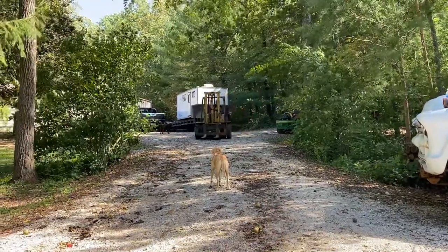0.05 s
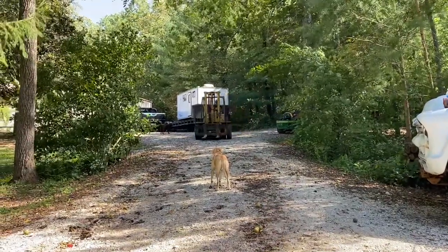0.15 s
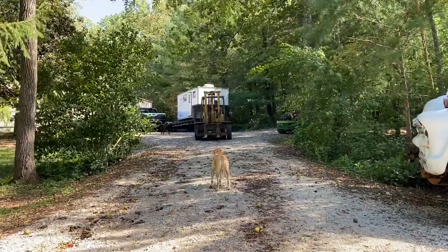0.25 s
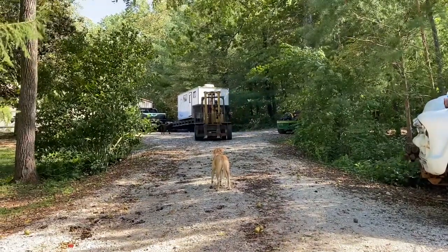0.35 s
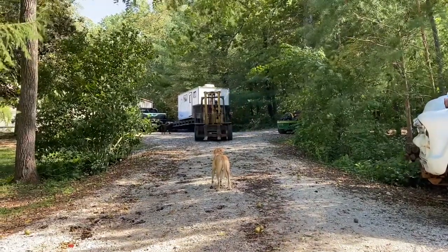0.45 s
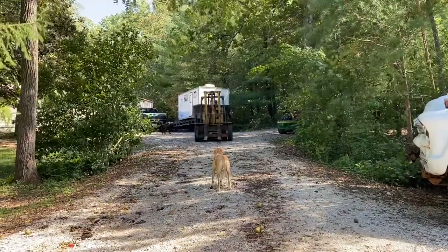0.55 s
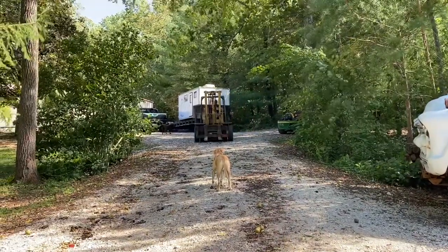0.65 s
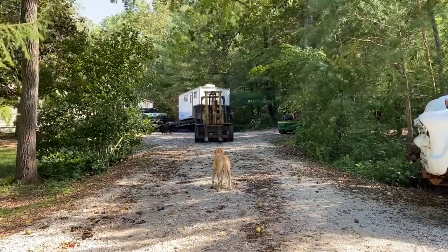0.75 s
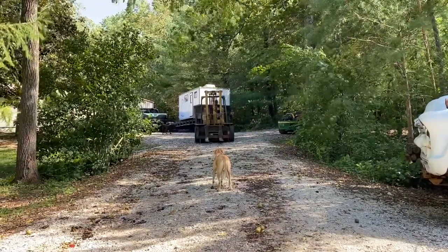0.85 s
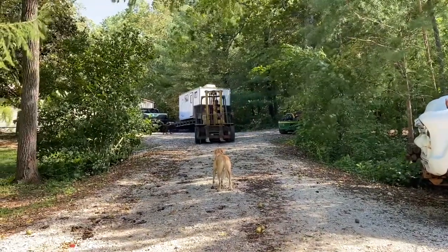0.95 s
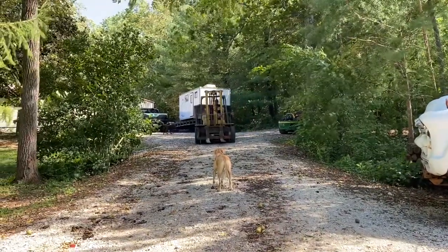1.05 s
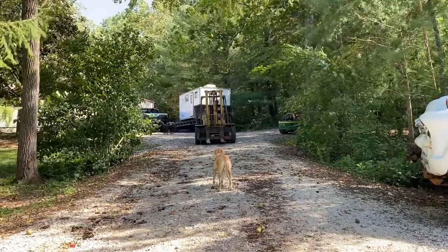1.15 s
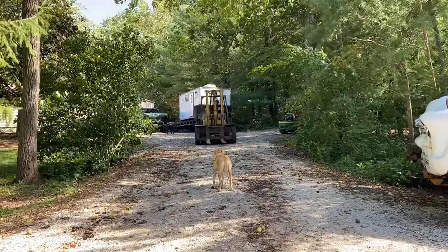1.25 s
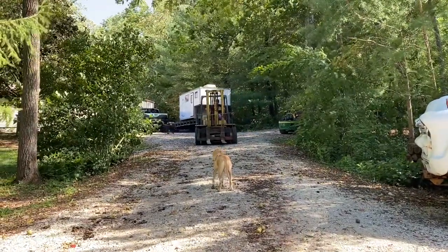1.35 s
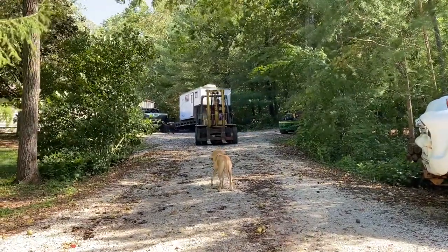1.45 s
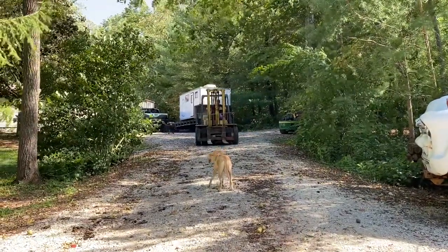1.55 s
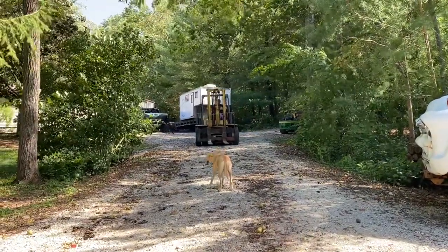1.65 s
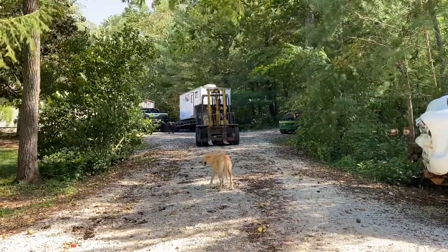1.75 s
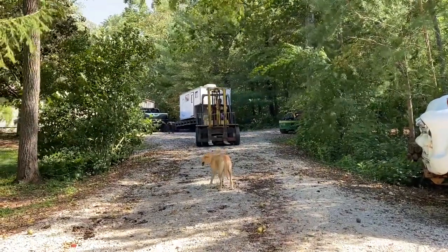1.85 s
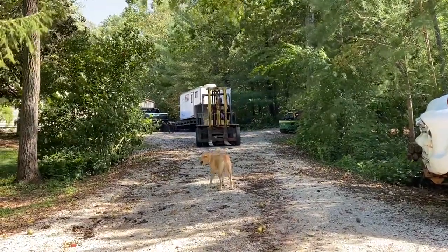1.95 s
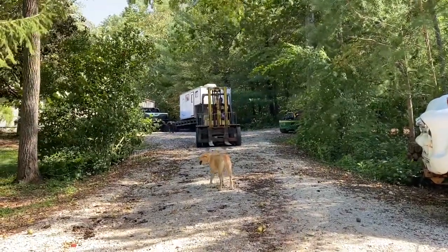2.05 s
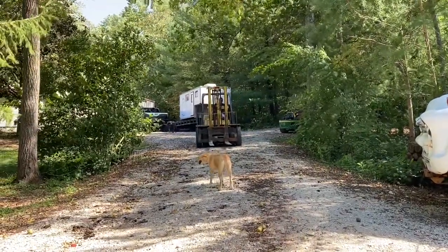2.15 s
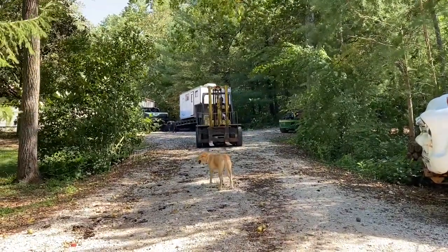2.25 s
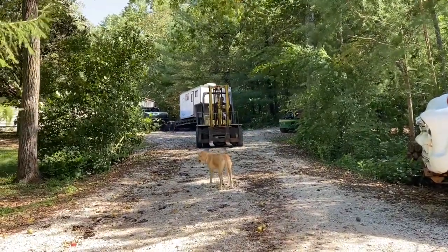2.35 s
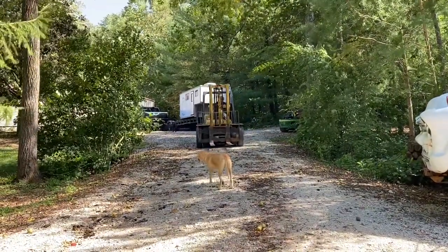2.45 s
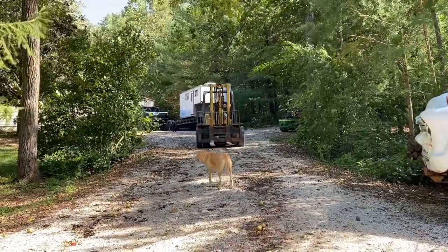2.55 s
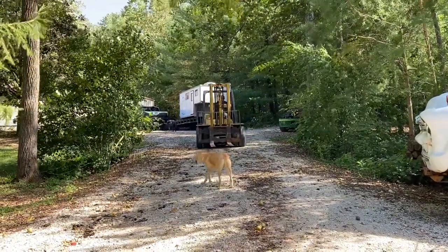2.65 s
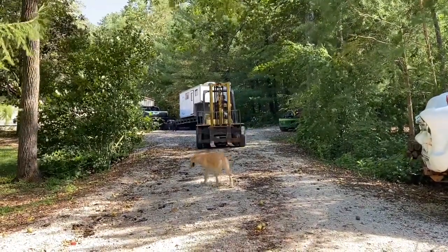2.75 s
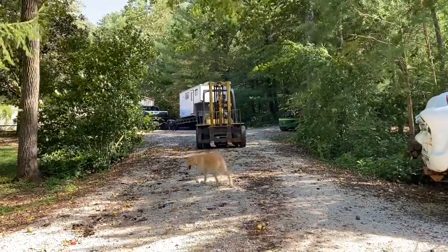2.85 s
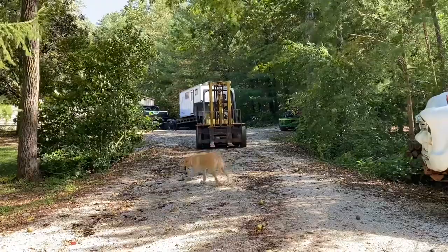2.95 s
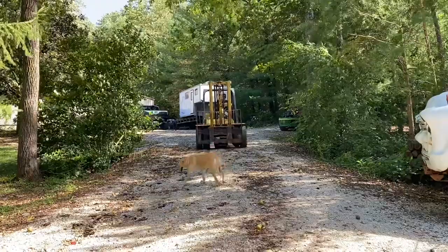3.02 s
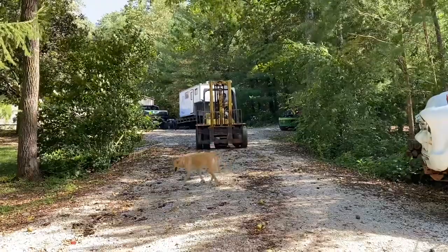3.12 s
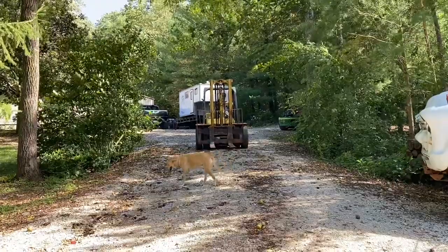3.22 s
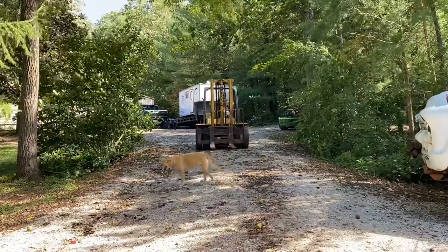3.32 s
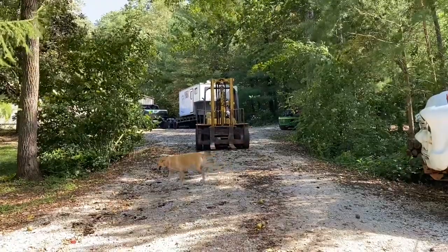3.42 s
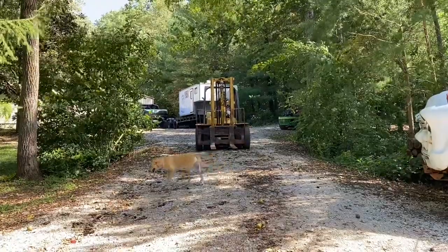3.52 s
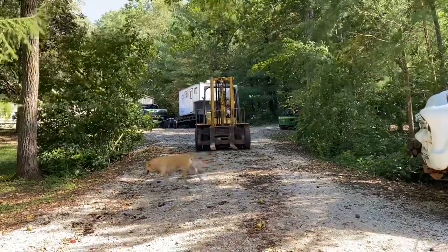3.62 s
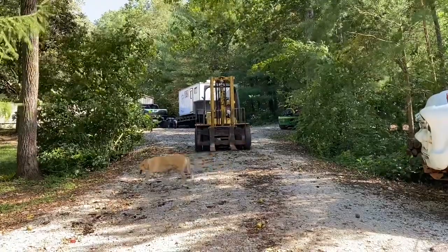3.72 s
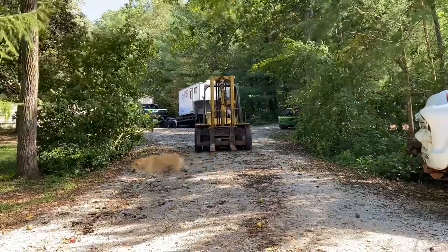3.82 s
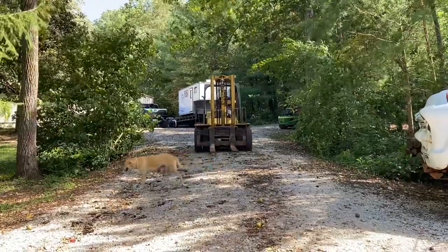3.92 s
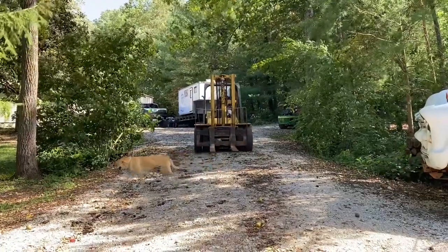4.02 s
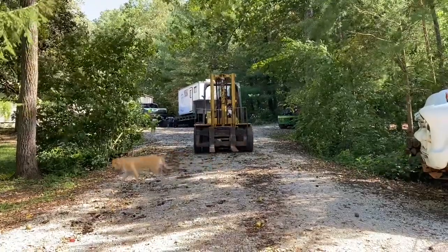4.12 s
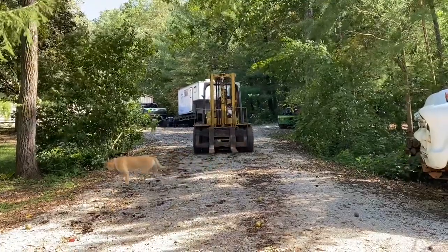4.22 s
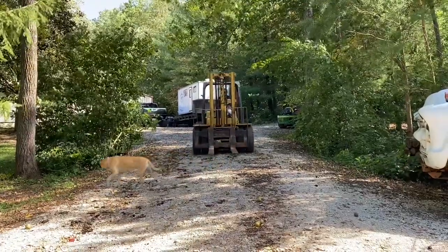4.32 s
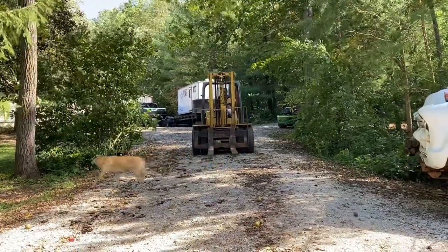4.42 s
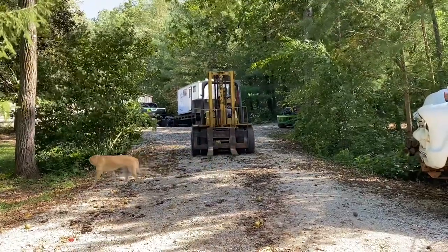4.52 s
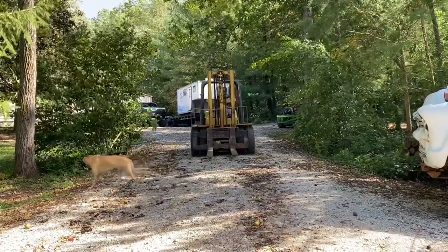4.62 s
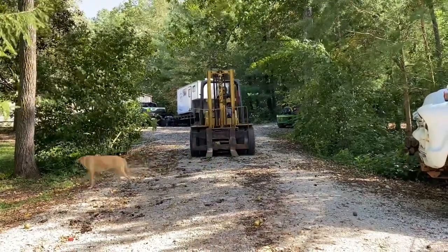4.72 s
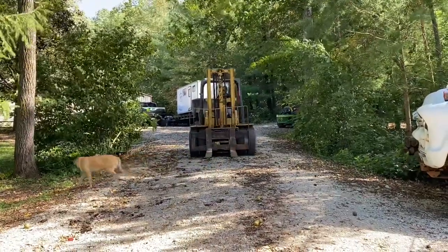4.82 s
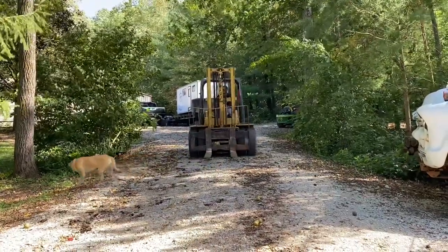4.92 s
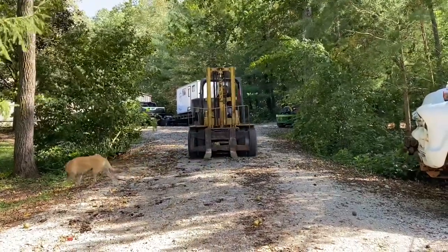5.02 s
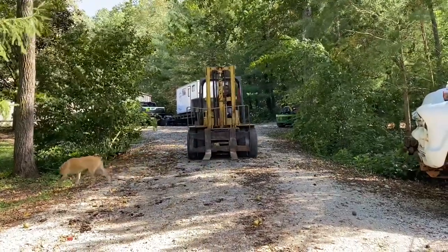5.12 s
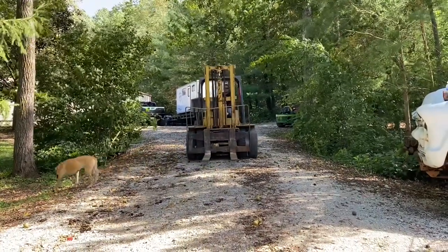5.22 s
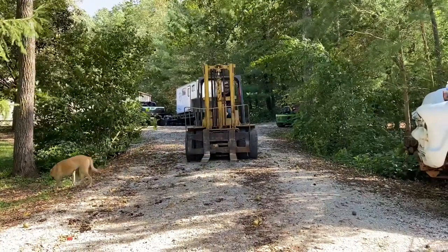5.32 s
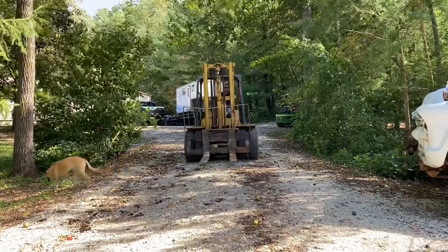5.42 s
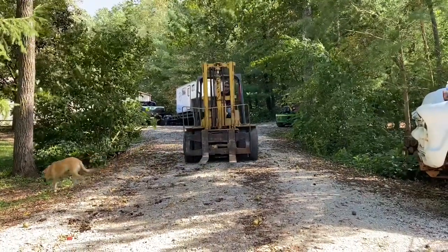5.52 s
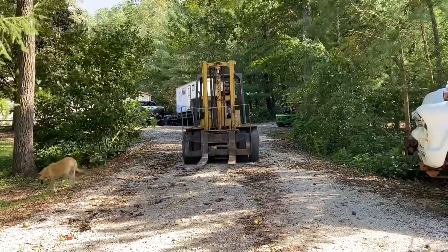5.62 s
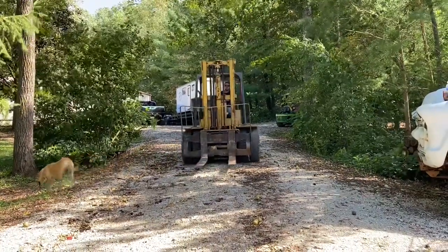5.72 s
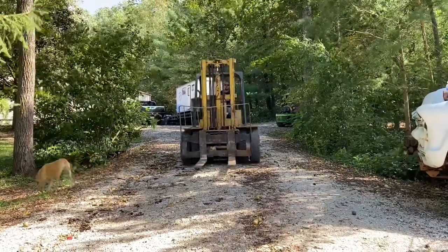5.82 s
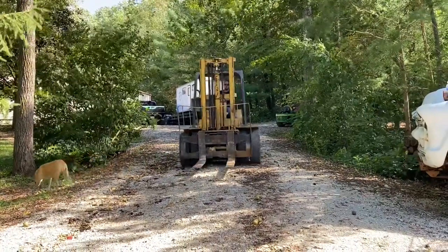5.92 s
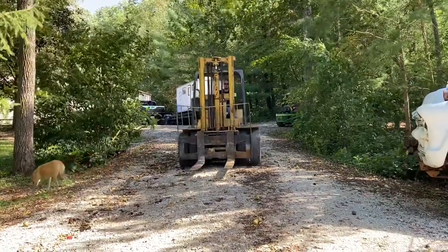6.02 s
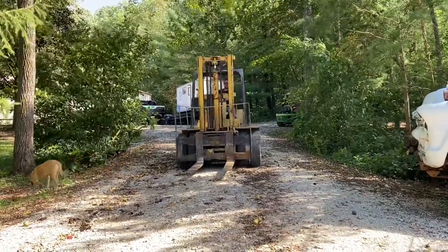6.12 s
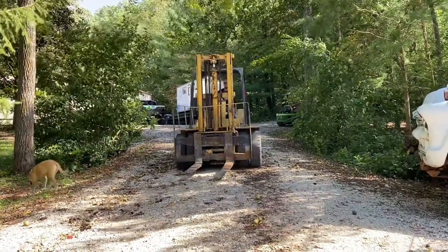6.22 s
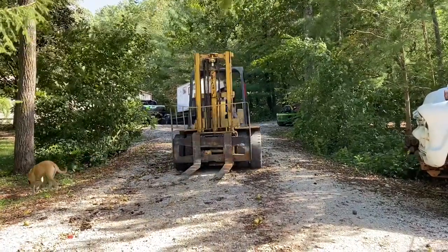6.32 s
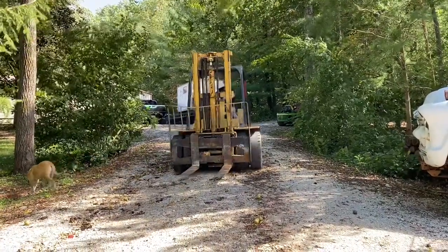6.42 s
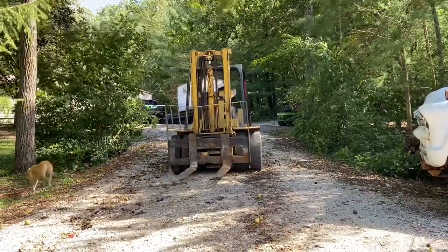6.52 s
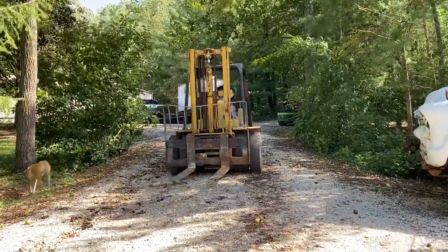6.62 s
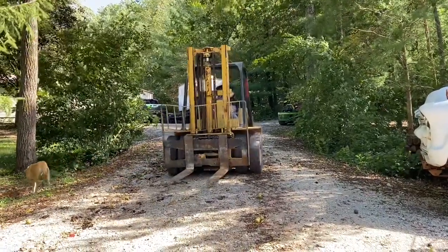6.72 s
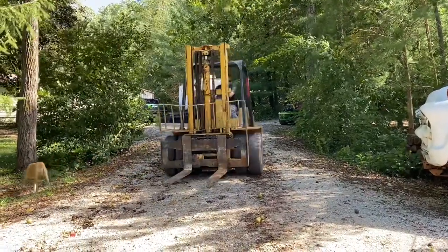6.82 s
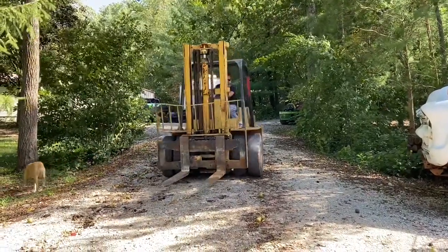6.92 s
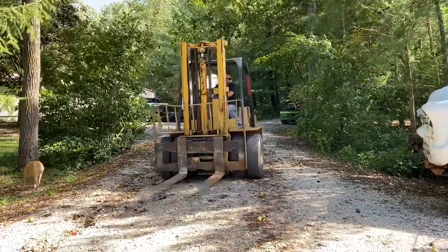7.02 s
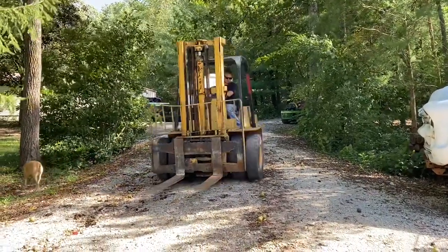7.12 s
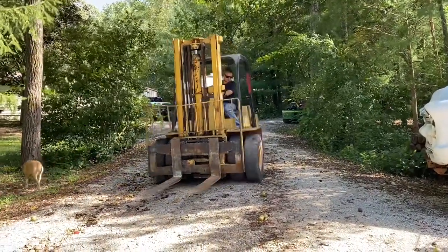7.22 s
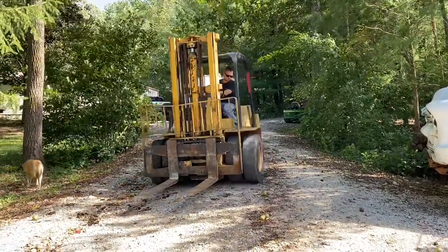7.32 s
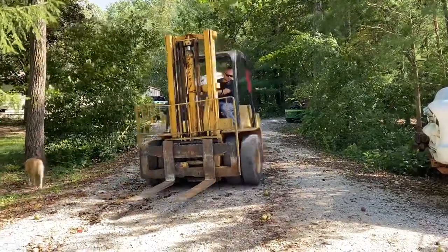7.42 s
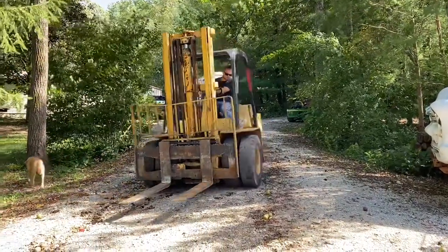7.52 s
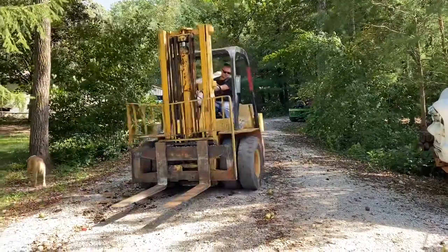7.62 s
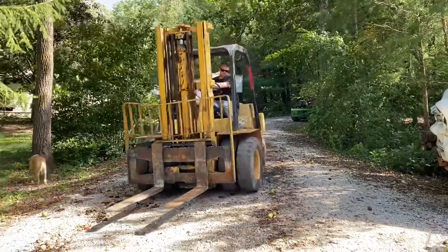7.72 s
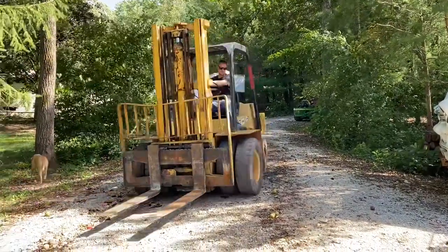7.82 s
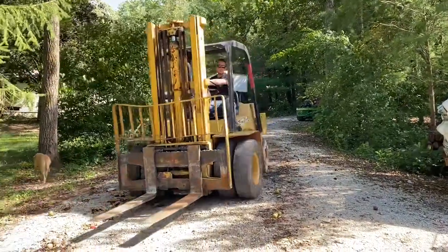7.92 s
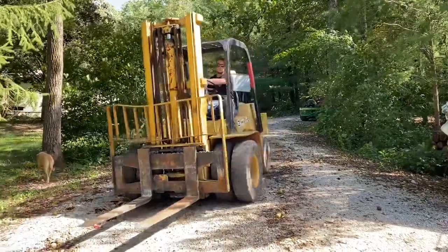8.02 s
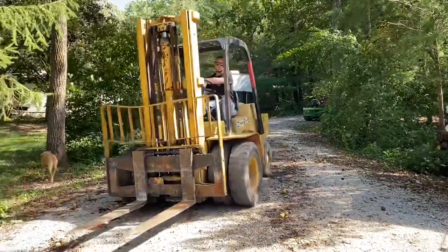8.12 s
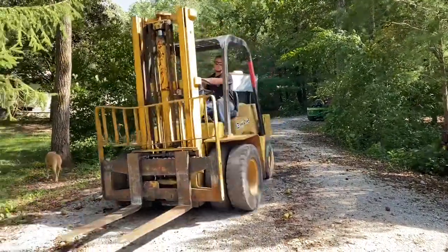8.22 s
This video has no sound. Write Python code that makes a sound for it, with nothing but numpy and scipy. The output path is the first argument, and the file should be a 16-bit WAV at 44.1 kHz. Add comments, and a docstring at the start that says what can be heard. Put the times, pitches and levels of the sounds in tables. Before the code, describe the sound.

Low steady diesel-like hum and unsteady roar approach along a gravel drive, with popping stones, steel clanks, dull chassis knocks and wind buffeting.

```python
"""Engine hum and a rough, unsteady roar come first, under a thin hiss and the chatter of loose steel.
A forklift rolls up a gravel drive between trees towards a phone, growing louder; a valve ticks each turn.
Stones pop and snap under the tyres; forks, mast and chassis clank, knock and ping over bumps; trees answer.
Gusts thump, flutter and pop at the two microphone ports, and a thin metal squeal scrapes now and then.
Hum is sines on shaft orders, steel is damped modes and shaped noise, and the rest is noise or short grains."""
import sys
import numpy as np
from scipy import signal
from scipy.fft import rfft, irfft, next_fast_len
from scipy.io import wavfile
from scipy.ndimage import uniform_filter1d, map_coordinates

SR = 44100
rng = np.random.default_rng(int(sys.argv[2]) if len(sys.argv) > 2 else 0)


def dump_mix(stems):
    """Bounce the given channels to the path in sys.argv[1] as a 16-bit WAV at rate SR."""
    frames = np.atleast_2d(stems).T  # one column per channel
    limited = np.clip(frames, -1, 1)  # hard clip at full scale
    pcm = np.round(limited * 32767).astype(np.int16)
    wavfile.write(sys.argv[1], SR, pcm)


N = 364266

# engine shaft speed: start_s, speed_turns_per_s
SHAFT_SPEED = [(0, 25.4), (1.5, 25.4), (2.2, 25.2), (2.8, 25.0), (3.3, 24.9), (3.6, 24.6), (5.3, 24.65),
               (6, 24.8), (8.26, 24.76)]
# upper hum orders, relative to the 3rd: order_per_turn, level_db
UPPER_ORDERS = [(4, -8.5), (6, -18), (8, -21), (11, -22)]
# brief dips of the hum: start_s, hold_s, second_order_loss_db, third_order_loss_db
HUM_DIPS = [(0, 0.16, 3, 6), (.8, 0.31, 11, 1), (1.287, .08, 1, 6), (3.0, 0.13, 3, 3),
            (3.856, 0.031, 16, 10), (4.392, 0.044, -2, 3), (5.12, 0.096, -1, 10), (5.813, 0.68, 13, 12.5),
            (6.84, 0.062, 0, 2), (7.194, 0.089, 12, 9.5)]
# colour of the engine roar: pitch_hz, relative level_db
ROAR_COLOUR = [(30, -45), (60, -6), (150, -2), (400, -6.5), (700, -10), (1300, -15.5), (1900, -32),
               (4000, -47.5)]
# colour of the engine clatter: pitch_hz, relative level_db
CLATTER_COLOUR = [(600, -8.5), (1350, 10), (1700, 2), (2200, 2), (4000, -1), (6300, -6), (8000, -9.5),
                  (11000, -36), (15500, -61)]
# relative level of the valve tick: start_s, level_db
TICK_LEVEL = [(0, -61), (1.2, -58), (3.1, -50), (3.6, -47.5), (6.05, -44.5), (7.1, -59), (8.26, -65)]
# how hard the ground jolts the truck: start_s, jolt_db
JOLTS = [(0, 4.5), (.18, 8.5), (.39, 6), (.55, 8.5), (.71, 8.5), (1.22, 3), (2.21, 0.5), (2.71, 3.5),
         (3.08, 1.3), (4.42, 2), (5.5, -0.3), (5.89, 2), (6.62, -0.2), (7.08, 1.8), (8.26, -0.5)]
# ringing modes of forks and mast: pitch_hz, relative level_db, t60_s
STEEL_MODES = [(1690, -8, .08), (1945, 0, .09), (2475, -3, .1), (2620, -2, .08), (3155, -5, .1),
               (3560, -9, .1), (3855, -8, .1), (4580, -9, .08), (6300, -12, .05)]
# bouts where loose steel chatters harder: start_s, length_s, extra_db
CHATTER_BOUTS = [(3.81, 0.051, 10), (4.106, 0.25, 11), (4.442, 0.11, 12.5), (4.56, .07, 11),
                 (5.03, 0.89, 5), (5.75, 0.2, 8), (6.202, 0.35, 9), (7.296, 0.12, 4)]
# colour of the continuous hiss: pitch_hz, relative level_db
HISS_COLOUR = [(6000, -101), (9500, 5), (11000, 4.5), (14000, -21), (15500, 0.5)]
# brief flares of the treble: start_s, length_s, relative level_db
TREBLE_FLARES = [(3.93, .06, -56), (4.27, .09, -53), (4.399, .012, -53), (4.5, 0.036, -51),
                 (4.54, .025, -50), (4.72, 0.072, -54), (5.243, .04, -55), (6.19, .05, -53),
                 (6.712, 0.033, -48), (6.95, .12, -54), (7.27, .03, -54), (7.797, .02, -55),
                 (8.106, 0.098, -49)]
# colour of those flares: pitch_hz, relative level_db
FLARE_TINT = [(6000, -40), (9500, 2), (13500, -2), (15500, -5)]
# stones that snap under a tyre: start_s, peak level_db, pitch_hz
STONE_SNAPS = [(0.0882, -24, 1500), (.1335, -18, 650), (.1555, -14, 483), (.434, -24, 800),
               (0.603, -21, 990), (2.301, -29, 2200), (2.986, -25, 1008), (3.461, -25, 3600),
               (4.688, -17.5, 4460), (5.029, -23, 2500), (5.279, -21, 1490), (6.79, -19, 800),
               (6.837, -15, 1300), (6.947, -14, 790), (6.948, -10, 324), (7.035, -18.5, 1500),
               (7.758, -17.5, 5500), (7.776, -15, 1300), (8.006, -19, 890), (8.204, -11, 1110)]
# clanks of forks and mast: start_s, relative level_db, body_over_clank_db, sizzle_over_clank_db
STEEL_CLANKS = [(0.122, -21, 3.5, -18), (0.1392, -25.5, 5, -11), (0.2668, -23, 0, -17),
                (0.461, -19.5, -3, -37), (0.4805, -13, 0.5, -26), (0.4992, -24, 8.5, -4.5),
                (0.563, -22, -9, -12.5), (0.614, -23.5, -11, -12.5), (0.656, -33, -18, -24),
                (2.479, -27, -20, -21), (2.504, -25, -5, -27), (3.6368, -29.5, 3, -21),
                (4.115, -27, -6, -31), (4.133, -24, -7, -30), (4.2401, -28, -4, -19),
                (4.4426, -29, 2.5, -27), (4.563, -29, -1, -20), (4.687, -36, 3, -12), (5.028, -25, 3, -40),
                (5.12, -25.5, 1, -22), (5.278, -33.5, 6, -27), (5.4049, -27.5, 5, -21),
                (5.753, -24, 0, -29), (5.9414, -22, -18, -36), (6.187, -32, 12.5, -22),
                (6.255, -29.5, 3, -23), (6.3754, -24, -6, -18), (6.8373, -23, -6, -30),
                (7.0808, -24.5, 2, -25), (7.232, -27, 5, -30), (7.3555, -25, 0, -34),
                (7.712, -23.5, 2, -28), (7.7568, -24.5, 7.5, -18), (7.845, -22, -6, -35),
                (8.085, -39, 13, -17)]
# ringing modes of the frame: pitch_hz, relative level_db, t60_s
FRAME_MODES = [(208, -6, .16), (325, 2, .13), (432, 1, .15), (571, -2, .12), (694, -2, .12),
               (1070, -12, .06)]
# small bright pings: start_s, relative level_db, pitch_hz, t60_s
BRIGHT_PINGS = [(.141, -32, 6300, 0.2), (.168, -33, 2480, .06), (.268, -36, 6460, .1),
                (0.321, -33, 1990, 0.12), (.479, -19, 2390, 0.072), (.48, -32, 6000, 0.052),
                (0.502, -26.5, 4380, 0.11), (0.503, -33, 7300, 0.14), (.573, -34, 2400, 0.051),
                (.618, -31, 4060, 0.082), (.639, -34, 3900, 0.14), (.645, -35, 6100, 0.11),
                (1.525, -37.5, 4260, 0.15), (1.77, -46, 4330, .15), (2.142, -44, 4400, 0.13),
                (4.066, -39, 4300, 0.11), (7.431, -36, 4420, .16)]
# dull knocks of the chassis: start_s, peak level_db of the note, pitch_hz
CHASSIS_KNOCKS = [(.204, -16.5, 423), (.272, -22, 486), (.297, -18.5, 526), (.323, -20.5, 430),
                  (.343, -21, 405), (.432, -23, 344), (.459, -23, 950), (.484, -15.5, 564),
                  (.494, -17.5, 480), (.511, -18, 400), (0.602, -24, 920), (.608, -30, 900),
                  (.86, -23, 453), (1.047, -24, 745), (1.73, -20, 447), (1.776, -28, 290),
                  (2.268, -30, 710), (2.301, -23, 564), (2.344, -24.5, 450), (2.593, -25, 1130),
                  (2.762, -26, 343), (2.789, -18.5, 340), (2.841, -28, 1210), (3.36, -30, 1900),
                  (4.488, -22.5, 363), (5.278, -29, 920), (6.067, -21, 1160), (6.79, -24, 660),
                  (6.837, -30, 1050), (7.36, -22, 830), (7.769, -26, 925), (8.107, -18.5, 484),
                  (8.202, -17.5, 896)]
# decay of the trees' answer: pitch_hz, t60_s
TREE_DECAY = [(200, 0.88), (2000, 0.2), (10000, 0.25)]
# gusts: start_s, hold_s, relative thump_db, relative flutter_db
WIND_GUSTS = [(.62, 0.0076, -60, -50), (0.699, 0.074, -41, -54), (1.256, 0.091, -40, -44),
              (3.84, 0.16, -30.5, -38.5), (3.99, 0.037, -25.5, -49), (4.264, 0.038, -29, -36),
              (4.94, 0.24, -28, -36), (5.304, 0.042, -26.5, -44), (5.443, 0.06, -28, -28.5),
              (5.556, 0.19, -27, -49), (5.853, 0.38, -43, -42), (6.25, 0.01, -32, -41),
              (6.448, 0.18, -40.5, -54), (6.65, 0.13, -40, -50), (6.853, 0.35, -29.5, -38)]
# colour of the low wind thump: pitch_hz, relative level_db
THUMP_COLOUR = [(20, -34), (45, -7), (70, 5.5), (120, -4), (200, -29), (400, -55), (800, -120)]
# colour of the wind flutter: pitch_hz, relative level_db
FLUTTER_COLOUR = [(60, -47), (150, 0.5), (300, -8.5), (500, -22), (900, -40), (2000, -120)]
# single wind pops: start_s, relative level_db, pitch_hz
WIND_POPS = [(1.267, -16.5, 113), (3.944, -16.5, 135), (3.999, -6.5, 120), (5.118, -11, 130),
             (5.234, -15.5, 197), (5.309, -12.5, 170), (5.424, -13, 148), (5.442, -7, 187),
             (5.486, -11, 277), (5.512, -9, 188), (7.099, -13, 150), (7.139, -12, 130)]
# thin metal squeals: start_s, length_s, relative level_db
METAL_SQUEALS = [(4.157, 0.22, -48), (4.442, 0.1, -49), (4.56, .07, -52), (4.97, 0.055, -49),
                 (5.11, .09, -51), (5.736, 0.041, -46), (5.885, .04, -49)]
# how unlike left and right are: pitch_hz, angle_rad
PORT_WIDTH = [(60, 0.0078), (250, 0.046), (700, 0.26), (1400, 0.43), (3000, 0.63), (6500, 0.58),
              (9000, 0.28), (15000, 0.38)]
# phase by which left leads right: pitch_hz, lead_rad
PORT_LEAD = [(700, 0), (1400, .3), (1900, -.5), (2600, .5), (6300, .8), (8200, -2.9), (9700, -6.3),
             (11300, -9.3), (13200, -12.4), (15300, -15.8)]
# how much louder left is than right: pitch_hz, tilt_db
PORT_TILT = [(300, 0), (700, 0.5), (1400, 3.5), (2800, -0.1), (5000, 0.5)]

FAR_M, NEAR_M = 24.76, 6.64  # the truck closes in at an even speed
# base levels at 10 m, before jolts
ROAR_DB, CLATTER_DB, RATTLE_DB, SECOND_DB, THIRD_DB = -31.5, -41, -50, -31.5, -26
JOLT_ROAR, JOLT_CLATTER, JOLT_TICK, JOLT_RATTLE = 0.83, 0.87, 1.3, 0.54  # dB gained per dB of jolt
SECOND_GROWS = 0.79  # share of the approach gain in the 2nd order
UPPER_GROWS = 0.27  # extra share of it in the upper orders
DIP_FALL_S, DIP_RETURN_S = 0.023, 0.17
HISS_PATCHY_DB, FLUTTER_PATCHY_DB = 1.5, 2.5  # depth of patches
CLUMP_S = .012  # mean delay of a stone within its clump
SNAP_CYCLES = 5  # swings until the main note of a snap has lost 60 dB
KNOCK_T60_S, KNOCK_SHORTENS = 0.028, 0.41  # decay at 1000 Hz; power of pitch by which higher ones die sooner
KNOCK_RISE_CYCLES, KNOCK_CRACK_DB, KNOCK_OVERTONES_DB = 0.66, -10, -11.5
GUST_RISE_DB_PER_S, GUST_FALL_DB_PER_S = 199, 137
CALM_THUMP_DB, CALM_FLUTTER_DB = -54, -58
GUST_APART = .8  # part of a gust that differs between the ports
SQUEAL_HZ, TOP_HZ = 3855, 15760
TIME_S = np.arange(N) / SR
HIT_S = np.arange(SR // 8 * 2) / SR  # time within one steel hit
HIT_HZ = np.fft.rfftfreq(len(HIT_S), 1 / SR)


def amp(db):
    """Turns dB into gain."""
    return np.exp(np.asarray(db) * np.log(10) / 20)


def unit(x):
    """Scales to an RMS of one."""
    return x / np.sqrt(np.mean(x ** 2) + 1e-20)


def along(points, hz):
    """Reads a (pitch_hz, value) table on a log pitch axis."""
    f, v = np.transpose(points)
    return np.interp(np.log(hz + 1), np.log(f + 1), v)


def curve(rows):
    """Draws a (start_s, value) table as an automation line."""
    s, v = np.transpose(rows)
    return np.interp(TIME_S, s, v)


def progress(start_s, length_s):
    """Runs from 0 to 1 over one event."""
    return np.clip((TIME_S - start_s) / length_s, 0, 1)


def wobble(rate):
    """Smooth random curve with rate knots a second."""
    coarse = np.arange(0, N + 32, 32)
    knots = rng.standard_normal(int(N * rate / SR) + 4)
    return np.interp(np.arange(N), coarse, map_coordinates(knots, [coarse * rate / SR]))


def filtered(x, response):
    """Filters x by a complex response of frequency."""
    m = next_fast_len(N + SR // 2)
    return irfft(rfft(x, m) * response(np.fft.rfftfreq(m, 1 / SR)), m)[..., :N]


def rush(colour, patchy_db):
    """Two unrelated coloured noises that share patches of random gain."""
    z = signal.stft(rng.standard_normal((2, N)), nperseg=512)[2]
    over_pitch = uniform_filter1d(rng.standard_normal(z.shape[1:]), 5, 0)
    patches = unit(uniform_filter1d(over_pitch, 8, 1))
    pair = signal.istft(z * amp(patchy_db * patches), nperseg=512)[1][:, :N]
    return unit(filtered(pair, lambda hz: amp(along(colour, hz))))


def add(track, s, sound):
    """Mixes a sound into the track at s seconds."""
    track[round(s * SR):][:len(sound)] += sound


def ring(modes, t):
    """Damped modes, struck at new strengths each time."""
    total = 0
    for hz, db, t60 in modes:
        strength_db = db + rng.normal(0, 3.5)
        total = total + amp(strength_db - 60 * t / t60) * np.sin(2 * np.pi * hz * t)
    return total


def bell(hz, width):
    """Broad hump on the log pitch axis that colours a hit."""
    return 1 / (1 + (np.log((HIT_HZ + 50) / hz) / width) ** 4)


def hit_noise(colour):
    """Coloured noise as long as one hit."""
    return unit(irfft(rfft(rng.standard_normal(len(HIT_S))) * colour))


def nearness():
    """Approach gain in dB over that at 10 m, falling off with distance."""
    return -20 * np.log10(np.linspace(FAR_M, NEAR_M, N) / 10)


def shaken(db, share):
    """Level in dB that follows nearness and the jolts."""
    return db + nearness() + share * curve(JOLTS)


def hum_dips():
    """Loss in dB of the 2nd and 3rd orders: each dip falls, holds and returns."""
    total = 0
    for s, hold, *lost_db in HUM_DIPS:
        corners = s + np.cumsum([-DIP_FALL_S, DIP_FALL_S, hold, DIP_RETURN_S])
        total = total + np.interp(TIME_S, corners, [0, 1, 1, 0]) * np.array(lost_db)[:, None]
    return total


def engine():
    """Shaft orders hum under an uneven, rough roar and clatter, and one valve ticks a turn."""
    speed = curve(SHAFT_SPEED)
    turn = np.cumsum(speed) / SR - .12
    near = nearness()
    second_db, third_db = near * [[SECOND_GROWS], [1]] + [[SECOND_DB], [THIRD_DB]] - hum_dips()
    load = 1.3 * np.tanh(wobble(6.8))  # all orders swell together, so their beat stays deep

    def order(k, db, lag):
        level = np.sqrt(2) * amp(db + load + 0.64 * wobble(6.8))
        return level * np.cos(2 * np.pi * k * turn + lag + 0.041 * k * wobble(6.5))

    hum = order(2, second_db, -0.058) + order(3, third_db, 0)
    for k, db in UPPER_ORDERS:
        hum += order(k, third_db + db + UPPER_GROWS * near, -0.56)

    firing = np.cos(2 * np.pi * (2 * turn - .3))  # a very slight ripple, twice a turn
    shake = wobble(5)  # the ride over the gravel shakes roar and clatter at once
    roar_db = shaken(ROAR_DB, JOLT_ROAR) + 0.46 * firing + 0.72 * shake + 1.5 * wobble(110)
    roar = amp(roar_db) * rush(ROAR_COLOUR, patchy_db=1.5)
    clatter_db = shaken(CLATTER_DB, JOLT_CLATTER) + 0.09 * firing + 0.63 * shake + 1.2 * wobble(90)
    clatter = amp(clatter_db) * rush(CLATTER_COLOUR, patchy_db=1.5)

    since = (turn - .66) % 1 / speed  # seconds since the valve last shut
    uneven_db = 2.5 * np.tanh(wobble(40))
    tick_db = curve(TICK_LEVEL) + JOLT_TICK * curve(JOLTS) - 3.5 + uneven_db - 60 * since / 0.049
    tick = amp(tick_db) * rush([(5500, -40), (6300, -12), (7100, -60)], patchy_db=1.0)
    return roar + clatter + tick + hum * [[1], [.6]]


def rattle():
    """Loose steel chatters in short bouts and keeps the fork modes sounding, the low ones most."""
    bouts = amp(5 * np.tanh(wobble(60))) * rng.standard_normal((2, N))
    harder_db = sum(db * np.sqrt(np.sin(np.pi * progress(s, length)).clip(0))
                    for s, length, db in CHATTER_BOUTS)

    def modes(f):
        return sum(amp(db) * 2000 / hz / (1 + 1j * (f - hz) * t60 / 2.5) for hz, db, t60 in STEEL_MODES)

    return amp(shaken(RATTLE_DB, JOLT_RATTLE) + harder_db) * unit(filtered(bouts, modes))


def hiss():
    """Continuous treble noise that follows nearness and jolts, with short grainy flares."""
    steady_db = shaken(CLATTER_DB, JOLT_CLATTER) - 15 + 1.1 * wobble(18)
    steady = amp(steady_db) * rush(HISS_COLOUR, HISS_PATCHY_DB)
    flares = sum(amp(db) * np.sin(np.pi * progress(s, length) ** .6).clip(0)
                 for s, length, db in TREBLE_FLARES)
    return steady + flares * amp(2.2 * wobble(150)) * rush(FLARE_TINT, HISS_PATCHY_DB)


def gravel(count=1400, size=5):
    """Stones pop in clumps as short damped grains that follow nearness and jolts; a few snap out."""
    when, pitch, big = rng.random((count, 3)).T
    clump = np.repeat(when[::size], size) * (N - SR // 10)
    start = (clump + CLUMP_S * SR * rng.exponential(1, count).clip(0, 5)).astype(int)
    hz, step = 330 * 25 ** pitch[:, None], np.arange(300)
    t = step / SR
    db = shaken(CLATTER_DB, JOLT_CLATTER)[start] + 5.0 + 21 * big ** 4 - 15 * pitch
    grains = amp(db[:, None] - 60 * t * hz / 3.2) * np.sin(2 * np.pi * hz * t)
    track = np.bincount((start[:, None] + step).ravel(), grains.ravel(), N + SR)
    t = np.arange(SR // 50) / SR
    for s, db, hz in STONE_SNAPS:
        modes = [(k * hz, level_db, SNAP_CYCLES / k / hz) for k, level_db in ((.75, -5), (1, 0), (1.35, -6))]
        snap = ring(modes, t) * np.tanh(1.5 * t * hz) ** 2
        add(track, s, amp(db) * snap / np.abs(snap).max())
    return track[:N]


def clanks(track):
    """Each clank is a ragged crash and thud over ringing forks and frame."""
    t = HIT_S
    for s, db, body_db, sizzle_db in STEEL_CLANKS:
        bounce = np.interp(t, np.arange(64) / 250, rng.standard_normal(64))
        ragged_db = 6 * np.tanh(t / 0.013) * np.tanh(bounce)  # the parts bounce as they settle
        dying = (1 - np.exp(-t / 0.00064)) * (amp(ragged_db - 60 * t / 0.21) + 0.73 * amp(-60 * t / 0.0072))
        peaks = sum(amp(level + rng.normal(0, 5)) / (1 + ((HIT_HZ - hz) / 120) ** 2)
                    for hz, level, _ in STEEL_MODES)
        crash = hit_noise(0.48 * peaks + .5 * bell(2500, 0.62))
        sizzle = hit_noise(bell(7000, .4))
        bright = dying * (crash + amp(sizzle_db + 9.5) * sizzle)
        add(track, s, amp(db - 12.5) * (bright + amp(-8.0) * ring(STEEL_MODES, t)))
        thud = amp(ragged_db - 60 * t / 0.19) * np.tanh(t / 0.00089) * hit_noise(bell(480, 1.01))
        add(track, s, amp(db + body_db - 8.0) * (thud + amp(-6.0) * ring(FRAME_MODES, t)))


def knocks(track):
    """Each chassis knock is a noisy crack and a damped note with overtones."""
    t = HIT_S
    for s, db, hz in CHASSIS_KNOCKS:
        t60 = KNOCK_T60_S * (1000 / hz) ** KNOCK_SHORTENS
        crack = np.tanh(t / 0.00064) * hit_noise(bell(1.4 * hz, .5))
        add(track, s, amp(db + KNOCK_CRACK_DB - 60 * t / 0.029) * crack)
        partials = [(k * hz, KNOCK_OVERTONES_DB, t60 / k) for k in (.9, 1.37, 2.18)]
        note = ring([(hz, 0, t60)] + partials, t) * (1 - np.exp(-t * hz / KNOCK_RISE_CYCLES)) ** 2
        add(track, s, amp(db) * note / np.abs(note).max())


def pings(track):
    """Each ping is a tight cluster of modes, heard as narrow dying noise."""
    for s, db, hz, t60 in BRIGHT_PINGS:
        cluster = hit_noise(1 / (1 + ((HIT_HZ - hz) / (.06 * hz)) ** 4))
        add(track, s, amp(db - 60 * HIT_S / t60) * (1 - np.exp(-HIT_S / 0.0033)) * cluster)


def steelwork():
    """Lays all hits of forks, mast and chassis on one track."""
    track = np.zeros(N + SR)
    clanks(track)
    pings(track)
    knocks(track)
    return track[:N]


def trees(x):
    """Scattered answer of the trees, each frequency dying at its own speed."""
    hz, t, z = signal.stft(rng.standard_normal((2, SR // 2)), SR, nperseg=256)
    decay = amp(-60 * t / along(TREE_DECAY, hz)[:, None])
    tail = signal.istft(z * decay, SR, nperseg=256)[1]
    return signal.fftconvolve(x[None], tail / np.linalg.norm(tail[0]), axes=1)[:, :N]


def gusts():
    """Gains of thump and flutter: over a calm floor each gust rises, holds and falls."""
    total = amp([[CALM_THUMP_DB], [CALM_FLUTTER_DB]])
    for s, hold, *db in WIND_GUSTS:
        rise_db = -GUST_RISE_DB_PER_S * np.maximum(s - TIME_S, 0)
        fall_db = -GUST_FALL_DB_PER_S * np.maximum(TIME_S - s - hold, 0)
        total = total + amp(rise_db + fall_db) * amp(db)[:, None]
    return total


def wind():
    """Lumpy buffeting, partly shared by the two ports, and single pops of one or two swings."""
    thump_gain, flutter_gain = gusts()
    lumps = amp(4 * np.tanh(wobble(22)))
    thump = unit(lumps * rush(THUMP_COLOUR, patchy_db=2.5)) * thump_gain
    flutter = unit(lumps * rush(FLUTTER_COLOUR, FLUTTER_PATCHY_DB)) * flutter_gain
    shared, apart = thump + flutter
    pops, t = np.zeros(N + SR), np.arange(SR // 10) / SR
    for s, db, hz in WIND_POPS:
        swing = t * hz * np.exp(-2.1 * t * hz) * np.sin(2 * np.pi * hz * t)
        add(pops, s, amp(db + 11.5) * swing)
    return shared + GUST_APART * apart * [[1], [-1]] + pops[:N] * [[1.15], [.85]]


def squeal():
    """An unsteady, scraping tone that swells and stops."""
    swell = sum(amp(db) * np.sqrt(np.sin(np.pi * progress(s, length)).clip(0))
                for s, length, db in METAL_SQUEALS)
    scrape = amp(4 * np.tanh(wobble(70)))
    return np.sqrt(2) * swell * scrape * np.sin(2 * np.pi * SQUEAL_HZ * TIME_S + 1.1 * wobble(140))


def ports(pair):
    """A direct and a scattered sound as the two microphone ports pick them up."""
    mid, side = filtered(pair, lambda hz: [np.cos(along(PORT_WIDTH, hz)), np.sin(along(PORT_WIDTH, hz))])

    def skew(hz):  # half of the difference to each port
        left_over_right = amp(along(PORT_TILT, hz)) * np.exp(1j * along(PORT_LEAD, hz))
        return left_over_right ** np.array([[.5], [-.5]])

    return filtered([mid + side, mid - side], skew)


def scene():
    """Truck, hits and the echo of the hits reach both ports; the wind acts on the ports themselves."""
    truck = engine() + rattle() + hiss()
    hits = gravel() + steelwork() + squeal()
    echo = amp([[-8], [-2.5]]) * trees(hits)
    return ports(truck + hits * [[1], [0]] + echo) + wind()


def record(dry):
    """The phone keeps nothing above its band limit."""
    return filtered(dry, lambda hz: hz < TOP_HZ)


dry = scene()
out = record(dry)
dump_mix(out)
```